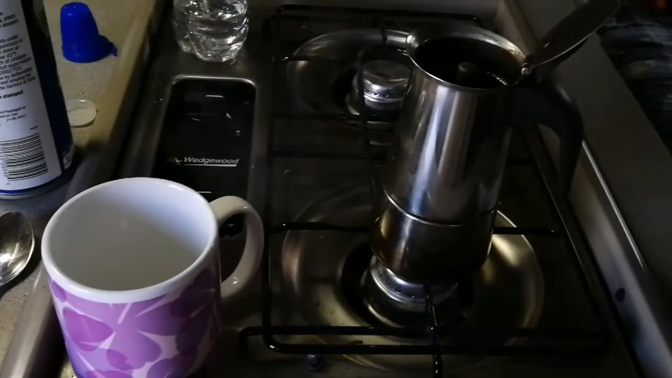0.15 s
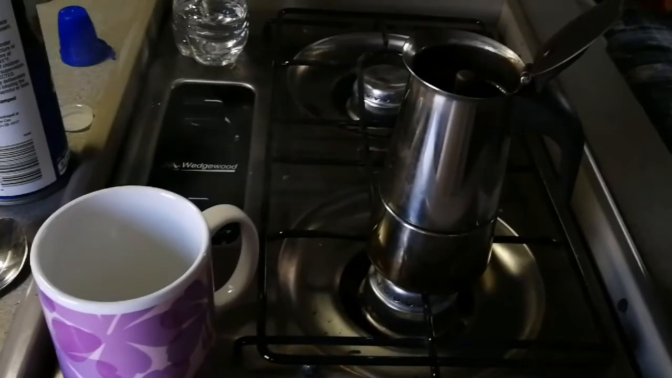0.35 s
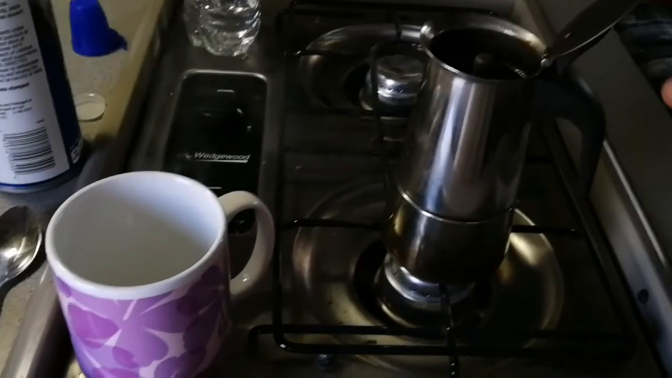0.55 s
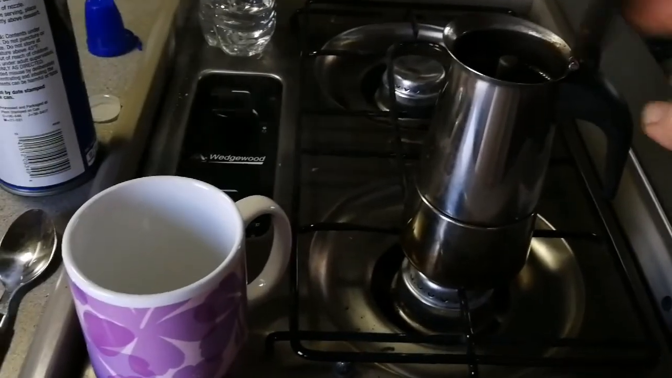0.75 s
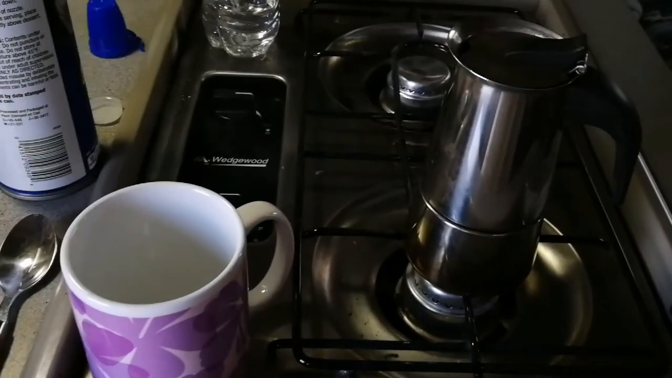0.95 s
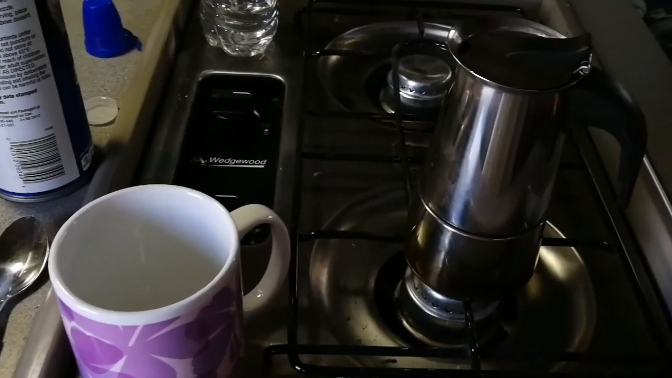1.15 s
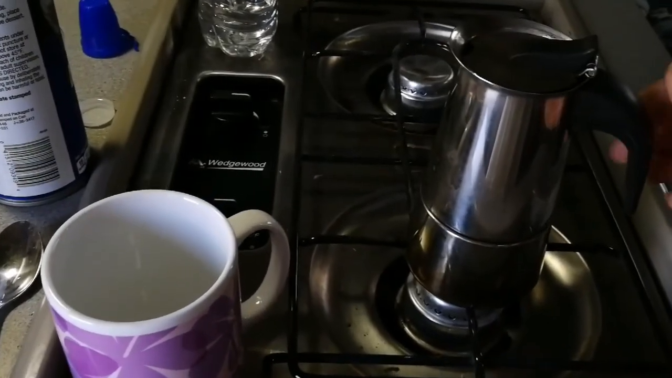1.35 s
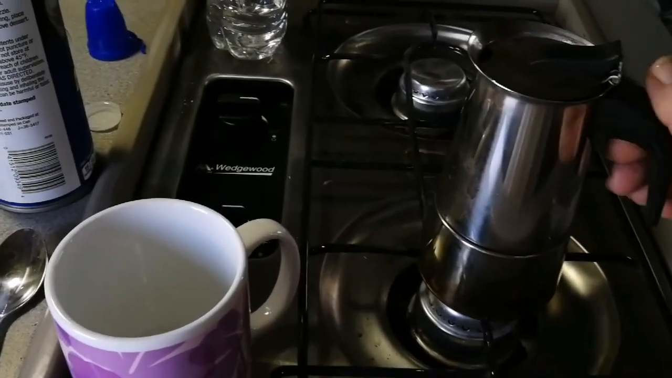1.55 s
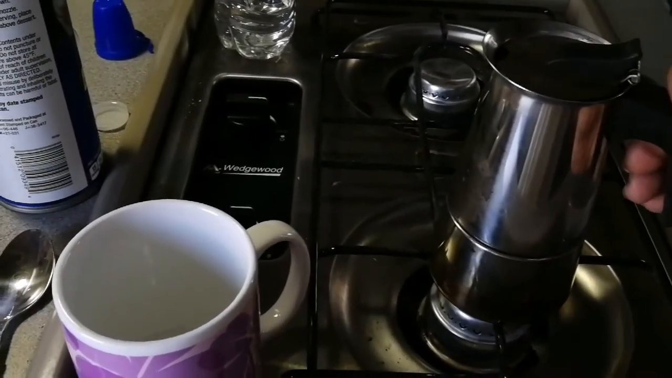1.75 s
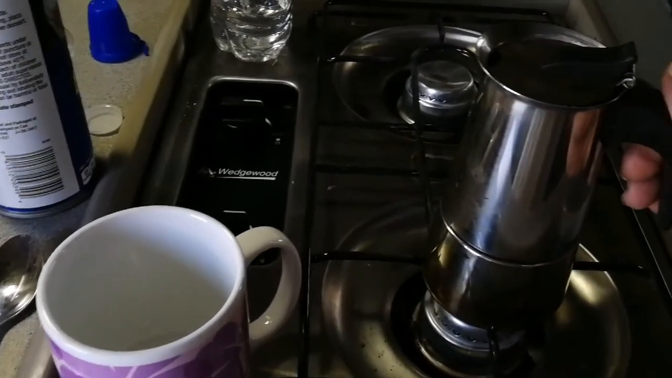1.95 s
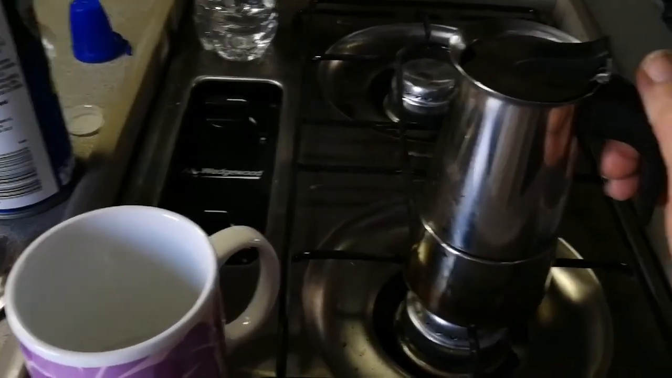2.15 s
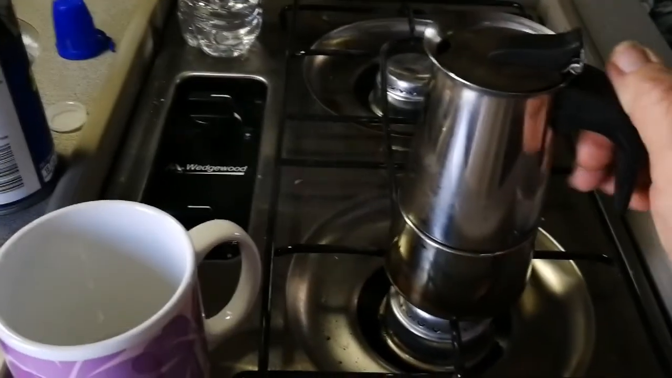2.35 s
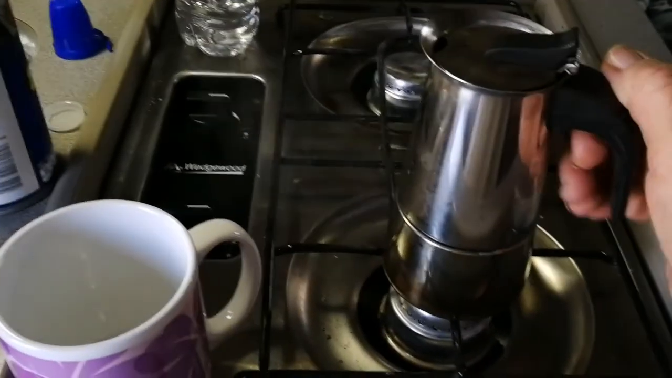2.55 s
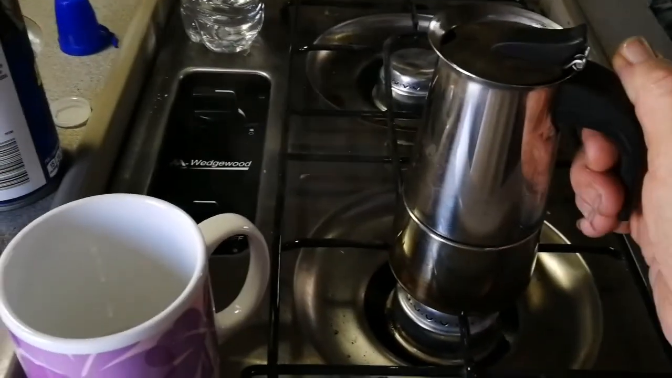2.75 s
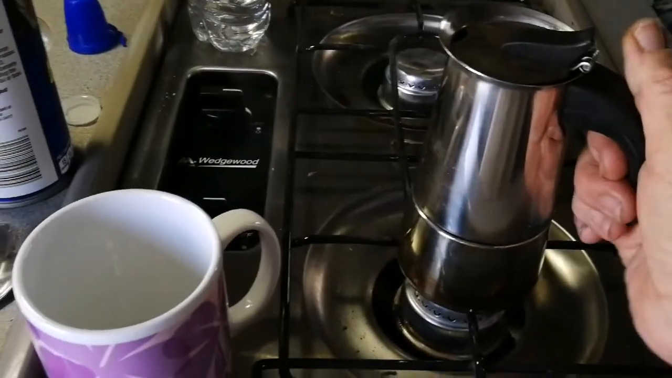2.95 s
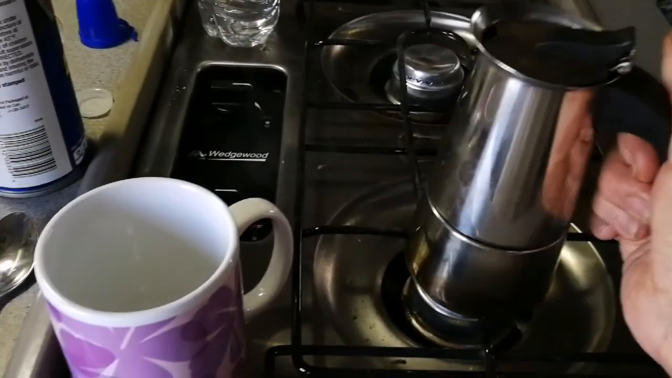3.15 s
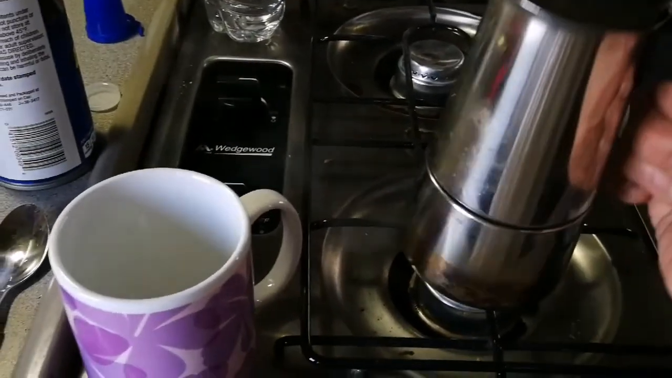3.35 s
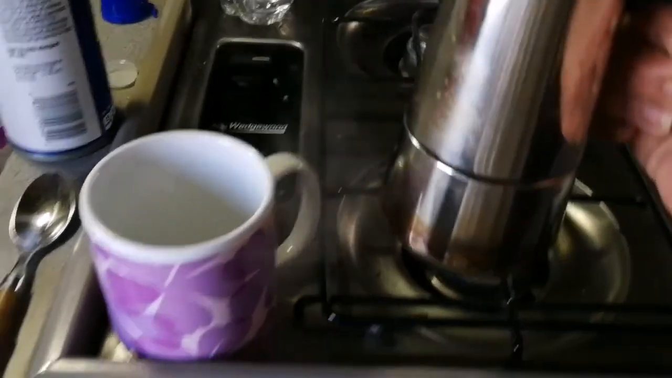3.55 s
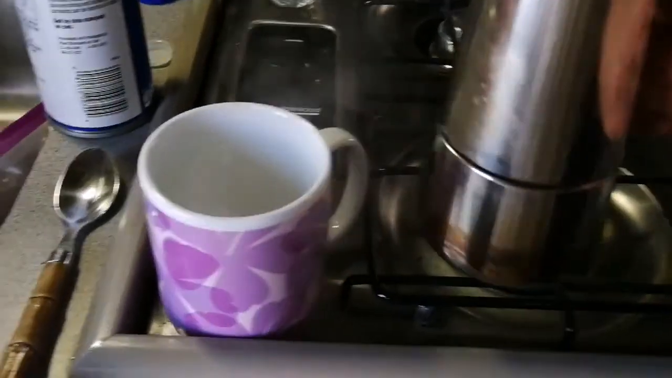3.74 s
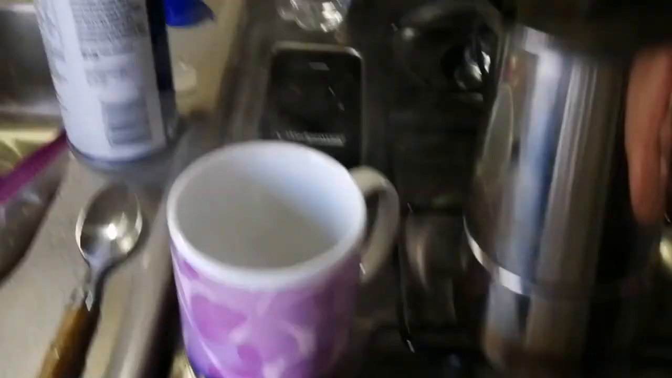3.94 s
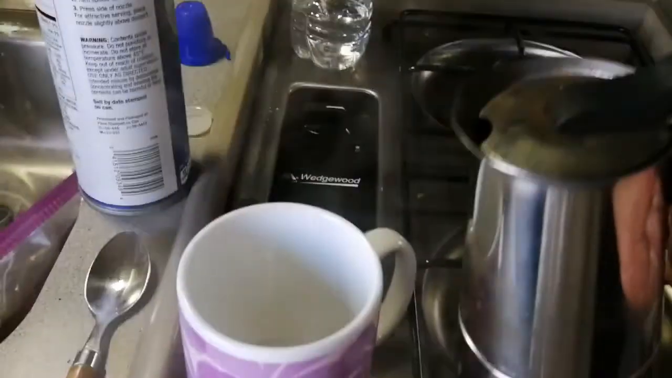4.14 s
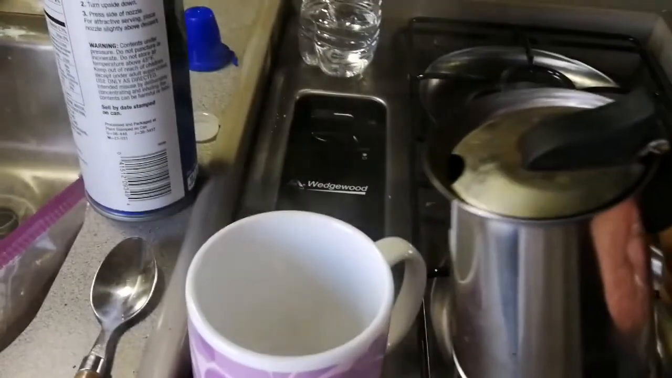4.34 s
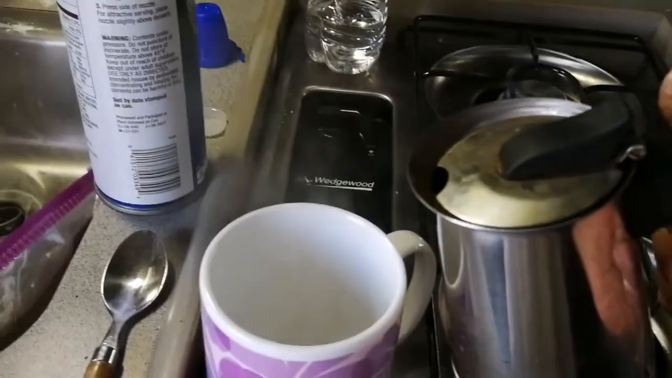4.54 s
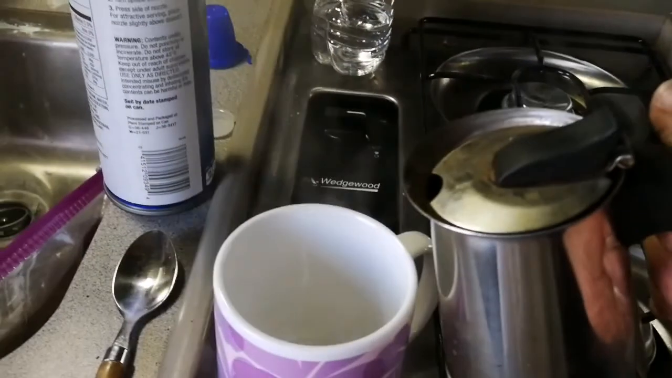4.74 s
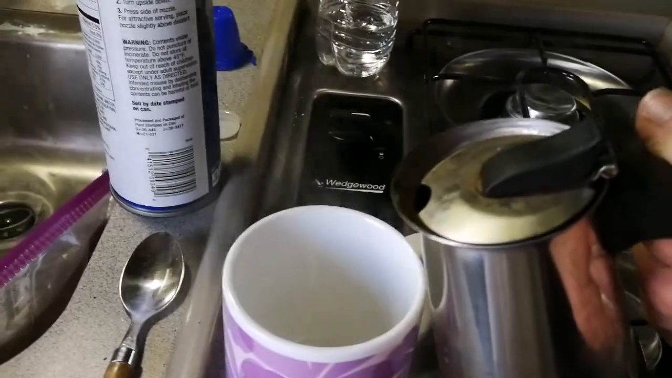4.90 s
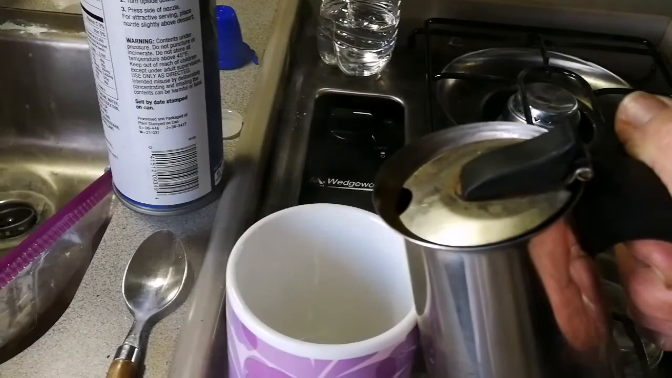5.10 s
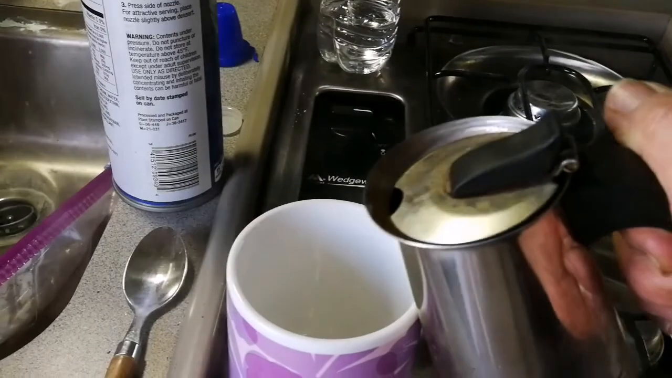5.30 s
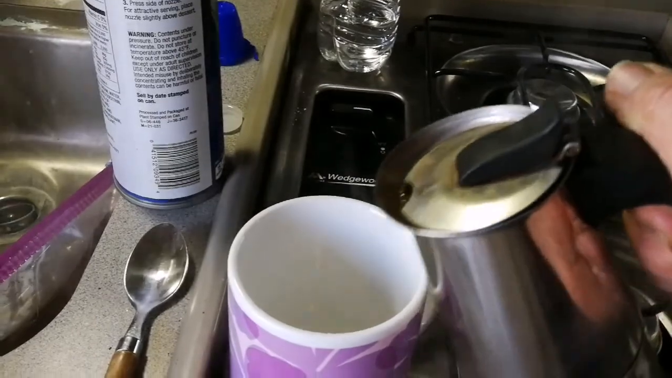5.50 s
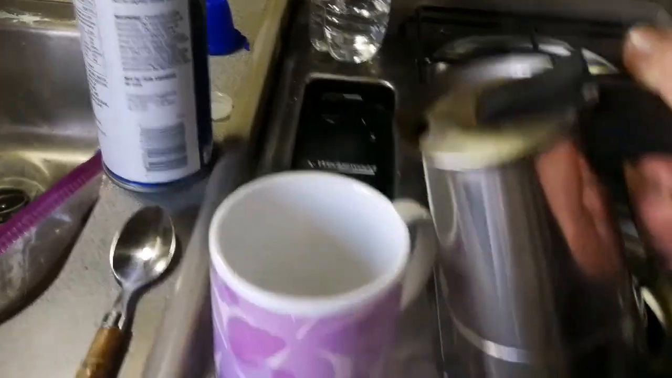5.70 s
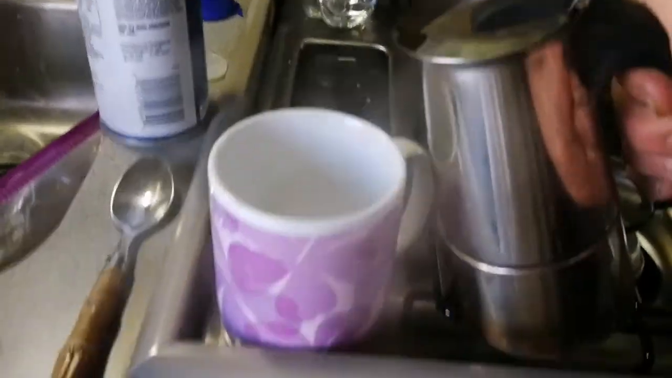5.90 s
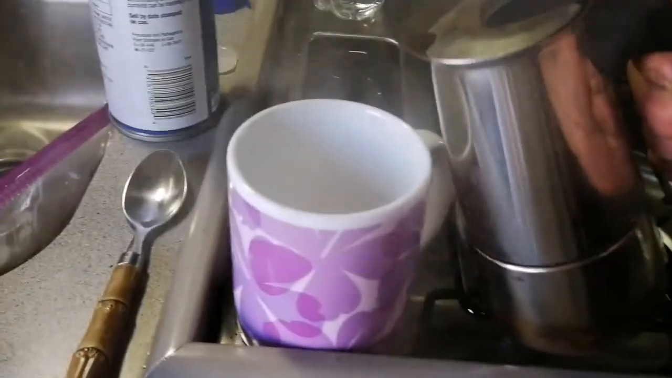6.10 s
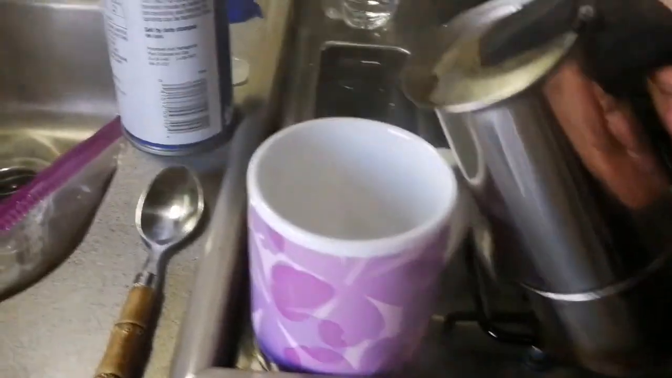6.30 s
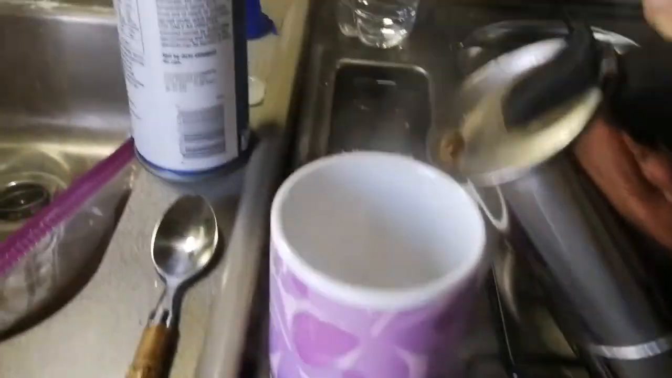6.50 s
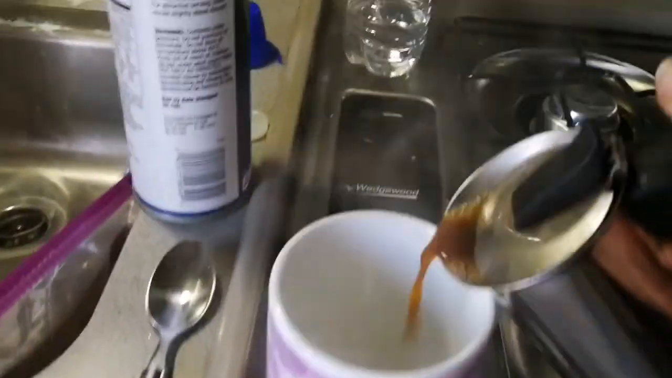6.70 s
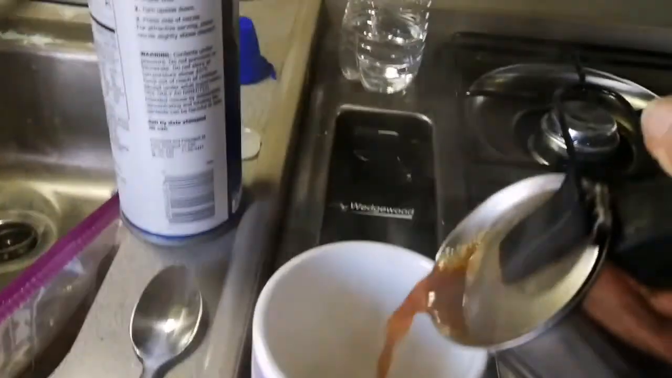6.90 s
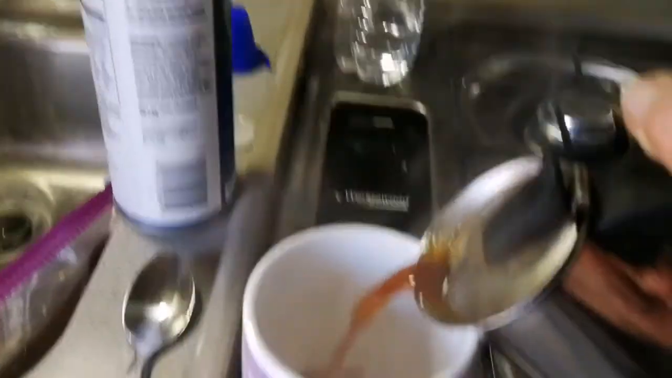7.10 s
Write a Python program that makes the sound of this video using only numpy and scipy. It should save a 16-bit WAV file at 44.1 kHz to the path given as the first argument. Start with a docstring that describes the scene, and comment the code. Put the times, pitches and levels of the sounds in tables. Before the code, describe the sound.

A boiling coffee pot sputters brightly until its steel lid snaps down, then bubbles with a hollow muffled note, hissing and knocking as it is lifted and tipped.

```python
"""One hears hollow pops in a steel coffee pot on a gas ring; the lid drops shut and narrows them to one note;
the pot is lifted, hisses, bumps a mug and tilts to pour, and the note falls.
Bubbles are noise bursts, chirped sines and low thumps; lid, pot and contacts are decaying sines and noise;
boil, steam and flame are shaped noise. Two microphone ports and a short cabin tail make it stereo."""
import sys
import numpy as np
from scipy import signal
from scipy.fft import rfft, irfft, next_fast_len
from scipy.io import wavfile
from scipy.ndimage import uniform_filter1d, map_coordinates

SR = 44100
rng = np.random.default_rng(int(sys.argv[2]) if len(sys.argv) > 2 else 0)


def wav_record(signal):
    """Record a signal, one row per channel, as 16-bit PCM in the file named by sys.argv[1]."""
    frames = np.transpose(np.atleast_2d(signal))
    bounded = np.clip(frames, -1, 1)
    # unit amplitude maps onto the largest positive 16-bit level
    quanta = np.round(bounded * 32767).astype(np.int16)
    wavfile.write(sys.argv[1], SR, quanta)


N = 320166
TIME = np.arange(N) / SR

# Large bubbles. Each row: time of the swell's peak in seconds, level in dB.
LARGE_POPS = [(0.015, -31), (0.045, -34), (0.072, -35.5), (0.0854, -33), (0.093, -33.5), (0.12, -40.5),
              (0.16, -36), (0.166, -32.5), (0.1937, -35), (0.2038, -33), (0.2335, -25), (0.302, -31),
              (0.336, -27.5), (0.401, -27), (0.4429, -29.5), (0.4604, -24.5), (0.4996, -28.5),
              (0.556, -30.5), (0.597, -26.5), (0.6033, -29.5), (0.641, -22.5), (0.7634, -25.5),
              (0.841, -25.5), (1.032, -26), (1.067, -25), (1.099, -26), (1.1294, -31), (1.156, -32.5),
              (1.177, -22), (1.214, -27.5), (1.269, -25), (1.2839, -25), (1.3381, -29.5), (1.36, -31),
              (1.3824, -24.5), (1.4141, -22), (1.4333, -23), (1.484, -27), (1.578, -22), (1.5966, -28.5),
              (1.6493, -20), (1.7969, -31.5), (1.822, -19), (1.8497, -35), (1.883, -28.5), (1.909, -24.5),
              (1.9486, -19), (1.9612, -23), (2.0617, -20.5), (2.0806, -23), (2.1007, -27), (2.135, -29),
              (2.219, -22), (2.254, -19), (2.3775, -20.5), (2.4486, -26), (2.4605, -26), (2.4849, -31),
              (2.506, -33), (2.519, -25), (2.548, -30), (2.612, -22), (2.648, -22), (2.7023, -28),
              (2.7285, -22.5), (2.758, -25.5), (2.8553, -20), (2.9223, -27), (2.9415, -16.5),
              (3.037, -27.5), (3.047, -29.5), (3.094, -28.5), (3.1144, -31), (3.226, -29.5), (3.274, -25),
              (3.293, -28.5), (3.3368, -28), (3.3454, -26), (3.3815, -23.5), (3.4201, -29.5),
              (3.468, -28.5), (3.5169, -26.5), (3.566, -27.5), (3.5871, -25.5), (3.595, -22), (3.676, -32),
              (3.6986, -22), (3.8073, -30), (3.8613, -17.5), (3.8906, -22.5), (3.9332, -22), (3.9525, -23),
              (3.97, -21), (4.0466, -17.5), (4.094, -22), (4.1286, -26.5), (4.1605, -26.5), (4.198, -26.5),
              (4.2528, -28), (4.3133, -24), (4.324, -22), (4.3559, -27.5), (4.3889, -20.5), (4.4492, -27.5),
              (4.4619, -24.5), (4.4884, -23), (4.539, -25), (4.605, -27), (4.627, -18.5), (4.6813, -23),
              (4.7317, -26.5), (4.7479, -22), (4.849, -22.5), (4.868, -25), (4.915, -24), (4.949, -22.5),
              (4.9728, -25.5), (4.9913, -24.5), (5.003, -25.5), (5.015, -29), (5.0309, -25.5),
              (5.041, -29.5), (5.053, -31), (5.085, -21.5), (5.1852, -23.5), (5.2048, -26), (5.2463, -33),
              (5.265, -37), (5.279, -27.5), (5.405, -30.5), (5.4473, -24), (5.5494, -25.5), (5.605, -26.5),
              (5.6199, -22.5), (5.7386, -25), (5.752, -23), (5.786, -27), (5.795, -24.5), (5.928, -26),
              (5.9484, -21.5), (5.9585, -27), (5.9819, -26), (5.9983, -20.5), (6.132, -28), (6.1486, -28.5),
              (6.206, -28.5), (6.2355, -29), (6.294, -27.5), (6.378, -21), (6.527, -34), (6.5499, -30),
              (6.6466, -26.5), (6.6584, -25), (6.6982, -26.5), (6.743, -27.5), (6.756, -25.5),
              (6.771, -19.5), (6.816, -30.5), (6.853, -27.5), (6.9081, -21.5), (6.9234, -25.5),
              (6.9551, -21.5), (7.0085, -28), (7.097, -28), (7.108, -29.5), (7.127, -26.5), (7.1634, -27),
              (7.1802, -27.5), (7.2194, -28.5)]
# Colour of a burst, lid open. Each row: frequency in Hz, relative density in dB per Hz.
OPEN_POT_COLOUR = [(100, -38), (500, -14.5), (750, -14.5), (1000, -2.5), (1400, -0.5), (2000, 2),
                   (2750, -1), (3000, -12.5), (4300, -23.5), (15000, -32.5)]
# Colour of a burst, lid shut. Each row: frequency in Hz, relative density in dB per Hz.
SHUT_POT_COLOUR = [(100, -46), (400, -25), (750, -21.5), (1000, -10), (1550, -7.5), (2200, -16.5),
                   (3200, -37), (4400, -48.5), (4800, -36.5), (5500, -31.5), (6600, -42.5), (8400, -47),
                   (9300, -33.5), (11500, -51), (13300, -39), (15700, -47.5)]
# Resonance of the open chamber. Each row: frequency in Hz, width in Hz, gain in dB.
MOUTH_MODES = [(2670, 98, -1)]
# Lid landing and bouncing. Each row: start in seconds, relative level in dB.
LID_LANDINGS = [(0.8803, 1.5), (0.9279, -21), (0.9323, -11), (0.9516, -25)]
# Lid on the rim. Each row: frequency in Hz, relative level in dB, t60 in seconds.
STEEL_MODES = [(4560, -1, 0.025), (6940, 9, 0.012), (8060, -5, 0.025)]
# The full pot. Each row: frequency in Hz, relative level in dB, t60 in seconds.
BODY_MODES = [(323.9, -0.5, 0.4), (1316, 17, 0.041), (1597, 14, 0.1)]
# Contacts of hand, grate and mug. Each row: start in seconds, relative level in dB, t60 in seconds,
# dullness in dB per octave, attack time constant in seconds.
CONTACTS = [(0.786, -24.5, 0.285, -12.5, 0.0061), (3.05, -36, 0.55, -12, 0.016),
            (5.123, -23, 0.17, -14, 0.00057), (6.049, -14.5, 0.16, -9.5, 0.0023),
            (6.126, -25, 0.319, -10, 0.0096), (6.761, -21.5, 0.2, -11, 0.0037),
            (7.054, -21.5, 0.133, -48, 0.0167)]
# Stove and worktop shaken by a bump. Each row: frequency in Hz, relative density in dB per Hz.
RUMBLE_COLOUR = [(30, -4), (90, 3), (200, -0.5), (380, 12.5), (600, -48.5)]
# Low pushes through the worktop. Each row: start in seconds, level in dB, frequency in Hz, t60 in seconds.
WORKTOP_THUDS = [(5.1289, -29.5, 247.4, 0.049)]
# Narrow hisses up the column. Each row: start in seconds, level in dB, centre in Hz, t60 in seconds.
STEAM_SPITS = [(0.2334, -51, 5065, 0.514), (1.414, -59.5, 4740, 0.56), (2.252, -53, 4860, 0.17),
               (3.934, -55, 4930, 0.58)]
# Steam hisses. Each row: start in seconds, level in dB, hold in seconds, release in seconds per 15 dB.
STEAM_PUFFS = [(4.221, -46, 0.26, 1.2), (5.074, -56, 0.13, 0.02), (5.312, -52.5, 0.45, 0.05),
               (6.132, -48, .008, 0.01), (6.171, -46, .006, 0.01), (6.221, -47, .02, 0.03),
               (6.265, -42.5, 0.42, 0.58)]
# Steam colour, pot upright. Each row: frequency in Hz, relative density in dB per Hz.
UPRIGHT_COLOUR = [(1500, 1.5), (2800, 3), (4400, -4.5), (5300, 2.5), (6400, -1), (7800, 7), (9200, -4),
                  (13000, -9), (16000, -12)]
# Steam colour, pot tipped. Each row: frequency in Hz, relative density in dB per Hz.
TIPPED_COLOUR = [(1500, -8), (2500, -4.5), (2900, -2.5), (3400, 1.5), (3800, -5), (5000, -3), (6400, 0),
                 (8900, -1), (10700, -11), (13100, -4), (15700, -10)]
# Gas ring and cabin. Each row: frequency in Hz, relative density in dB per Hz.
FLAME_COLOUR = [(20, -14), (45, -9), (190, -17.5), (290, -7), (445, -15.5), (740, -21), (1550, -18),
                (1900, -23.5), (3000, -29), (4300, -28.5), (5200, -24), (10300, -29), (11500, -33),
                (15700, -35)]
# Hiss band that moves with the pot. Each row: time in seconds, centre in Hz.
GLINT_PATH = [(0, 9500), (3.05, 9400), (3.5, 6600), (4.1, 8000)]
# Stereo likeness of diffuse noise. Each row: frequency in Hz, left-right correlation (1 = alike).
LIKENESS = [(60, 1), (250, 0.935), (550, 0.069), (1500, 0.745), (5000, 0.052), (15000, 0.059)]
# Port level difference. Each row: frequency in Hz, left minus right in dB.
PORT_LEAN = [(150, -2.5), (330, -0.5), (950, 7), (2400, 3), (6000, 3), (9000, 1.5), (13000, 1.5)]
# Port phase difference. Each row: frequency in Hz, lead of the left in radians.
PORT_LEAD = [(250, -0.19), (650, -1.13), (900, -1.09), (2500, 1.26), (4500, -1.27), (9000, 1.67)]
# Cabin decay. Each row: frequency in Hz, t60 in seconds.
CABIN_T60 = [(200, 0.169), (1500, 0.039), (10000, 0.058)]

SHUT_S = .88  # lid closes
TIP_FROM_S, TIP_TAKES_S = 6.314, 0.57  # pot leans from upright to pouring
OPEN_HZ, SHUT_HZ, TIPPED_HZ = 2066, 1470, 1174.2  # centre of the chamber's air note
OPEN_DB, SHUT_DB, TIPPED_DB = -52.5, -47.5, -50.5  # small bubbles
TIPPED_SPRAY_DB = -7  # bursts lose spray as the pot leans
CHIRP_PER_S, OPEN_RISE_RATIO = 25, .55  # pitch climb as a share of the note; quicker swell in the open pot
CRACK_DB, CRACK_TAU_S = 6, 0.00022  # bubble skin snaps
FIZZ_DB, FIZZ_T60_S = -14, .04  # spray falls back in the open pot
SIMMER_OPEN_DB, SIMMER_SHUT_DB, SIMMER_WIDTH_HZ = -57, -55.5, 153
RUMBLE_DB, RUMBLE_T60_S = -49, 0.68
SPURTS_FROM_S = 6.1  # after the mug is struck, steam comes in sudden spurts
PUFF_ATTACK_S, SPURT_ATTACK_S, PUFF_SAG_DB_PER_S = 0.0755, 0.00277, 6.5
FLAME_DB, GLINT_DB = -57, -68
TOP_HZ = 15780


def amp(db):
    """Amplitude ratio of a level in dB."""
    return 10 ** (np.asarray(db) / 20)


def unit(x):
    """x scaled to rms 1."""
    return x / np.sqrt(np.mean(x ** 2) + 1e-20)


def along(points, hz):
    """Value at hz, interpolated on a log frequency axis."""
    f, value = np.transpose(points)
    return np.interp(np.log(hz + 1), np.log(f + 1), value)


def wobble(rate_hz):
    """Smooth random curve, rate_hz knots a second."""
    knots = rng.standard_normal(int(N * rate_hz / SR) + 4)
    return map_coordinates(knots, [TIME * rate_hz])


def filtered(x, response):
    """x times a complex response of frequency."""
    m = next_fast_len(N + SR // 2)
    return irfft(rfft(x, m) * response(np.fft.rfftfreq(m, 1 / SR)), m)[..., :N]


def coloured(x, spectrum):
    """x through a minimum-phase filter of that spectrum and of energy 1."""
    cepstrum = irfft(np.log(amp(along(spectrum, np.fft.rfftfreq(2048, 1 / SR))) + 1e-6))
    cepstrum[1:1024] *= 2  # fold to the causal side
    cepstrum[1025:] = 0
    pulse = irfft(np.exp(rfft(cepstrum)))
    return signal.fftconvolve(x, pulse / np.linalg.norm(pulse))[:N]


def place(start_s, shapes):
    """Sum of the rows of shapes, each starting at its time."""
    at = np.round(np.asarray(start_s) * SR).astype(int)[:, None] + np.arange(shapes.shape[1])
    return np.bincount(np.clip(at, 0, N).ravel(), shapes.ravel(), N + 1)[:N]


def rush(spectrum, patchy_db):
    """Stereo noise of rms 1 with patches of random gain in time and frequency."""
    z = signal.stft(rng.standard_normal((2, N)), nperseg=512)[2]
    field = uniform_filter1d(rng.standard_normal(z.shape[1:]), size=6, axis=0)
    field = uniform_filter1d(field, size=10, axis=1)
    pair = signal.istft(z * amp(patchy_db * unit(field)), nperseg=512)[1][:, :N]

    def mid_side(hz):
        turn = np.arccos(np.clip(along(LIKENESS, hz), -1, 1)) / 2
        return amp(along(spectrum, hz)) * [np.cos(turn), np.sin(turn)]

    mid, side = filtered(pair, mid_side)
    return unit(np.array([mid + side, mid - side]))


def states(lid_open, lid_shut, tipped):
    """A value that jumps when the lid shuts and glides as the pot tips."""
    lean = np.clip((TIME - TIP_FROM_S) / TIP_TAKES_S, 0, 1)
    return np.where(TIME < SHUT_S, lid_open, lid_shut + lean * (tipped - lid_shut))


def ringing(modes, t):
    """Decaying sines, their strengths drawn anew at each call."""
    return sum(amp(db + rng.normal(0, 0.25) - 60 * t / t60_s) * np.sin(2 * np.pi * hz * t)
               for hz, db, t60_s in modes)


def gurgle():
    """Louder pops swell longer; two weaker ones follow each; small bubbles are loudest where pops crowd."""
    level_db = states(OPEN_DB, SHUT_DB, TIPPED_DB)
    note_hz = states(OPEN_HZ, SHUT_HZ, TIPPED_HZ)
    s, db = np.transpose(LARGE_POPS)
    hz = np.interp(s, TIME, note_hz) * np.exp(.06 * rng.standard_normal(len(s)))
    large = bubbles(s, db, hz, rise_s=.0012 * amp(.25 * (db[:, None] + 25)), spray_db=-11)

    luck = rng.random((len(s), 2, 3))
    late_s = s[:, None] + 0.002913 - .007 * np.log(1 - luck[..., 0])
    weaker_db = db[:, None] - 5 - 8 * luck[..., 1] - 14 * rng.random((len(s), 1))
    train_hz = hz[:, None] * np.exp(0.41 * (luck[..., 2] - .5))
    train = bubbles(late_s.ravel(), weaker_db.ravel(), train_hz.ravel(), rise_s=0.000922, spray_db=-11.5)

    crowd = uniform_filter1d(place(s, np.ones((len(s), 1))), size=2400)
    crowd = uniform_filter1d(crowd, size=1200)
    luck = rng.random((900, 3))
    at = (luck[:, 0] * N).astype(int)
    size_db = 12 * luck[:, 1] ** 2 + 8 * np.log10(.1 + np.abs(crowd[at]) / crowd.mean())
    small_hz = note_hz[at] * np.exp(.3 * (luck[:, 2] - .5))
    small = bubbles(at / SR, size_db, small_hz, rise_s=.0009, spray_db=-15)
    return large + train + amp(level_db) * unit(small)


def bubbles(s, db, hz, rise_s, spray_db):
    """Each bubble bursts, thumps the liquid column and rings the air, more strongly under the shut lid."""
    t = np.arange(SR // 12) / SR
    luck = rng.standard_normal((len(s), 3))
    is_open = (s < SHUT_S)[:, None]
    rise = rise_s * amp(2 * luck[:, :1]) * np.where(is_open, OPEN_RISE_RATIO, 1)
    swell = t / rise * np.exp(1 - t / rise)
    cycles = hz[:, None] * t * (1 + CHIRP_PER_S * (t / 2 - rise))  # on the note at the peak
    ring = swell * np.sin(2 * np.pi * cycles) * amp(np.where(is_open, -12, -2))

    fizz = is_open * amp(FIZZ_DB - 60 * t / FIZZ_T60_S)
    crack = amp(CRACK_DB - 60 * t / (CRACK_TAU_S * np.log(1000)))
    shape = swell + fizz + crack
    burst = shape * rng.standard_normal((len(s), len(t)))
    burst *= np.linalg.norm(shape, axis=1, keepdims=True) / np.linalg.norm(burst, axis=1, keepdims=True)

    thump_hz = 305 * amp(1.3 * luck[:, 1:2])
    thump = amp(3 * luck[:, 2:] + 5 * is_open - 60 * t / 0.05625) * np.sin(2 * np.pi * thump_hz * t)
    thump *= 1 - np.exp(-t / 0.0012)

    gain, start_s = amp(db)[:, None], s - rise[:, 0]
    spray = chamber_spray(place(start_s, gain * burst), spray_db)
    return place(start_s, gain * ring) + spray + amp(-22.5) * place(start_s, gain * thump)


def chamber_spray(burst, shut_db):
    """The chamber colours the bursts: its open mouth resonates, the shut lid filters, tipping weakens."""
    def mouth(f):
        return 1 + sum(amp(db) * 1j * f * width / (centre ** 2 - f ** 2 + 1j * f * width)
                       for centre, width, db in MOUTH_MODES)

    open_spray = filtered(coloured(burst * (TIME < SHUT_S), OPEN_POT_COLOUR), mouth)
    shut_burst = burst * (TIME >= SHUT_S) * amp(states(0, 0, TIPPED_SPRAY_DB))
    return amp(-7.5) * open_spray + amp(shut_db) * coloured(shut_burst, SHUT_POT_COLOUR)


def simmer():
    """The boil hisses broadly from the open pot and on the air note under the lid."""
    hz, t, z = signal.stft(rng.standard_normal(N), SR, nperseg=512)
    centre_hz = np.interp(t, TIME, states(SHUT_HZ, SHUT_HZ, TIPPED_HZ))
    band = z / (1 + ((hz[:, None] - centre_hz) / SIMMER_WIDTH_HZ) ** 2)
    hum = signal.istft(band, SR, nperseg=512)[1][:N]
    broad = coloured(rng.standard_normal(N), OPEN_POT_COLOUR)
    boil = np.where(TIME < SHUT_S, amp(SIMMER_OPEN_DB) * broad, amp(SIMMER_SHUT_DB) * unit(hum))
    return amp(2.95 * wobble(21)) * boil


def lid():
    """Each landing cracks, clatters and rings the steel; the shock booms in the chamber and rings the pot."""
    t = np.arange(SR // 3) / SR

    def noise(fast, slow):
        decay = fast * amp(-60 * t / 0.00653) + slow * amp(-60 * t / 0.1384)
        return decay * rng.standard_normal(len(t))

    s = [start_s for start_s, db in LID_LANDINGS]
    gain = [amp(db) for start_s, db in LID_LANDINGS]
    rim = place(s, np.array([g * (0.058 * ringing(STEEL_MODES, t) + noise(0.281, 0.0283)) for g in gain]))
    rim = filtered(rim, lambda f: 1j * f / (2200 + 1j * f))  # thin steel radiates little bass
    boom = coloured(place(s, np.array([g * noise(0.052, 0.068) for g in gain])), SHUT_POT_COLOUR)
    body = place(s, np.array([g * 0.0073 * ringing(BODY_MODES, t) for g in gain]))
    return rim + boom + body


def bumps():
    """Soft contacts: a dying scuff, a low rumble and the pot's ring, fainter the duller the contact."""
    out, t = 0, np.arange(SR // 2) / SR
    for s, db, t60_s, dull_db, attack_s in CONTACTS:
        def dull(f):
            return amp(dull_db * np.log2(1 + f / 1500)) / (1 + (300 / (f + 1)) ** 4)

        scuff = unit(filtered(rng.standard_normal(len(t)), dull)[:len(t)])
        scuff = scuff * 0.3 * amp(2.1 * wobble(139.0)[:len(t)])
        ring = amp(dull_db / 2 - 14) * ringing(BODY_MODES, t)
        hit = (scuff + ring) * amp(db - 60 * t / t60_s) * (1 - np.exp(-t / attack_s))
        shake = coloured(rng.standard_normal(len(t)), RUMBLE_COLOUR)[:len(t)]
        shake = shake * amp(RUMBLE_DB - 60 * t / RUMBLE_T60_S) * (1 - np.exp(-t / 0.0081))
        out = out + place([s], (hit + shake)[None])
    return out


def thuds():
    """Each push through the worktop is one short low decaying sine."""
    s, db, hz, t60_s = np.transpose(WORKTOP_THUDS)[:, :, None]
    t = np.arange(SR // 3) / SR
    return place(s[:, 0], amp(db - 60 * t / t60_s) * np.sin(2 * np.pi * hz * t))


def spits():
    """Steam squirts up the column at some pops: a broad tick and a longer narrow hiss."""
    out = 0
    for s, db, hz, t60_s in STEAM_SPITS:
        noise, age = rng.standard_normal(N), np.clip(TIME - s, 0, None)
        narrow = unit(filtered(noise, lambda f: 1 / (1 + ((f - hz) / 380) ** 2)))
        broad = unit(filtered(noise, lambda f: 1 / (1 + ((f - hz) / 2500) ** 2)))
        hiss = narrow * amp(-60 * age / t60_s) * (1 - np.exp(-age / 0.0038))
        tick = 5 * broad * (age > 0) * np.exp(-age / 0.0014)
        out = out + amp(db) * (hiss + tick)
    return out


def steam():
    """Liquid meets the hot wall when the pot moves: a hiss with a fine crackle."""
    crackle = amp(1.8 * wobble(40) + 1.85 * wobble(300))
    upright, tipped = rush(UPRIGHT_COLOUR, patchy_db=2.2), rush(TIPPED_COLOUR, patchy_db=1.6)
    return puffs() * crackle * np.where(TIME < SPURTS_FROM_S, upright, tipped)


def puffs():
    """Envelope of the steam: each hiss swells, sags while it holds, then dies away."""
    out = 0
    for s, db, hold_s, release_s in STEAM_PUFFS:
        age = np.clip(TIME - s, 0, None)
        sag_db = PUFF_SAG_DB_PER_S * np.minimum(age, hold_s)
        fall_db = sag_db + 15 * np.clip(age - hold_s, 0, None) / release_s
        attack_s = PUFF_ATTACK_S if s < SPURTS_FROM_S else SPURT_ATTACK_S
        out = out + np.clip(age / attack_s, 0, 1) ** 2 * amp(db - fall_db)
    return out


def flame():
    """Nearly steady burner noise, plus a noise band that the moving pot throws back."""
    hz, t, z = signal.stft(rng.standard_normal((2, N)), SR, nperseg=512)
    centre_hz = np.interp(t, *np.transpose(GLINT_PATH))
    band = z / (1 + ((hz[:, None] - centre_hz) / 500) ** 2)
    glint = signal.istft(band, SR, nperseg=512)[1][:, :N]
    burner = rush(FLAME_COLOUR, patchy_db=1.8)
    return amp(FLAME_DB + .7 * wobble(6)) * burner + amp(GLINT_DB) * unit(glint)


def cabin(x):
    """Noise tail, each frequency dying at its own speed; bass alike at both ports."""
    hz, t, z = signal.stft(rng.standard_normal((2, SR // 3)), SR, nperseg=256)
    z[1] = np.where(hz[:, None] < 400, z[0], z[1])
    tail = signal.istft(z * amp(-60 * t / along(CABIN_T60, hz)[:, None]), SR, nperseg=256)[1]
    delayed = np.pad(x, (130, 0))[None]  # samples
    return signal.fftconvolve(delayed, tail / np.linalg.norm(tail[0]), axes=1)[:, :N]


def ports(x):
    """Two microphone ports hear the pot at different strength and phase."""
    half = np.array([[.5], [-.5]])
    return filtered(x, lambda hz: amp(half * along(PORT_LEAN, hz)) * np.exp(1j * half * along(PORT_LEAD, hz)))


def scene():
    """Pot direct and through the cabin, steam stronger on the left, flame behind."""
    pot = gurgle() + simmer() + lid() + bumps() + thuds() + spits()
    return ports(pot) + amp(-9.5) * cabin(pot) + steam() * amp([[1], [-1]]) + flame()


def record(dry):
    """The microphone chain keeps nothing above its band limit."""
    return filtered(dry, lambda hz: hz < TOP_HZ)


dry = scene()
out = record(dry)
wav_record(out)
```